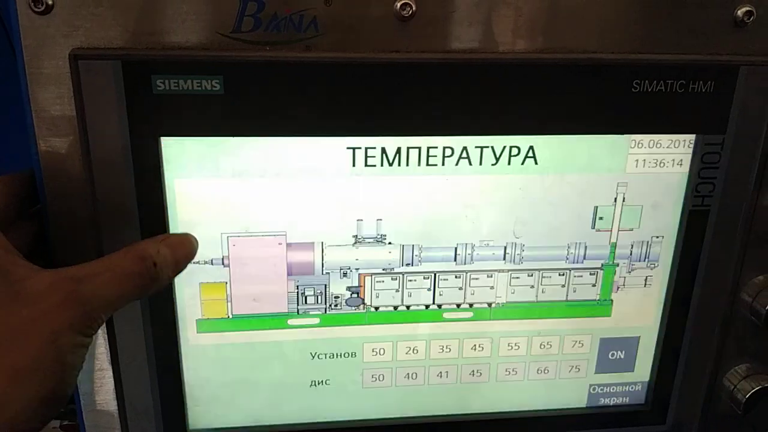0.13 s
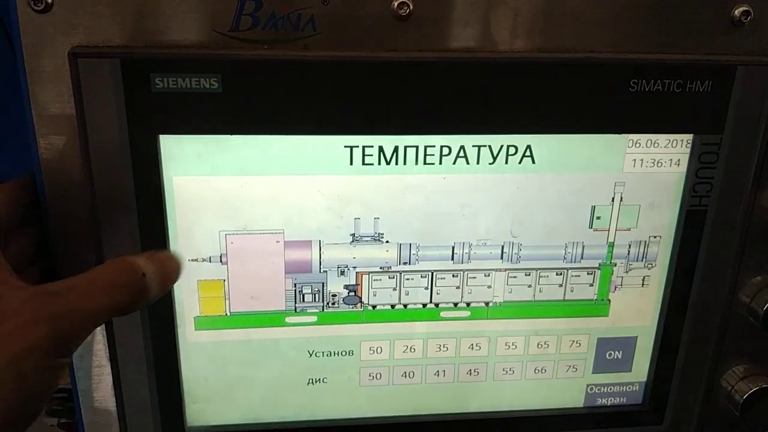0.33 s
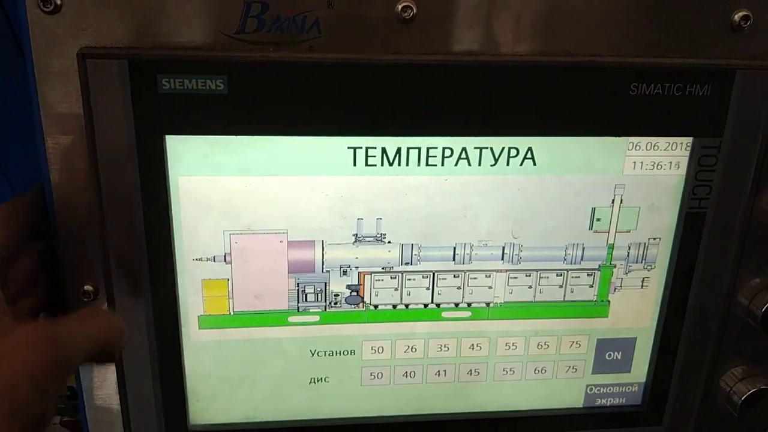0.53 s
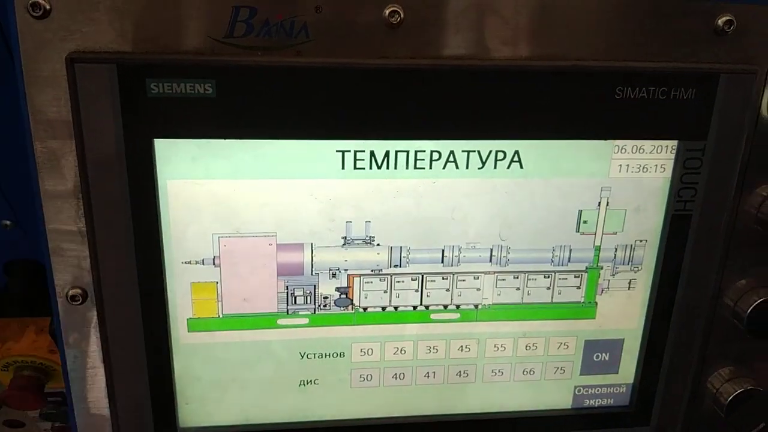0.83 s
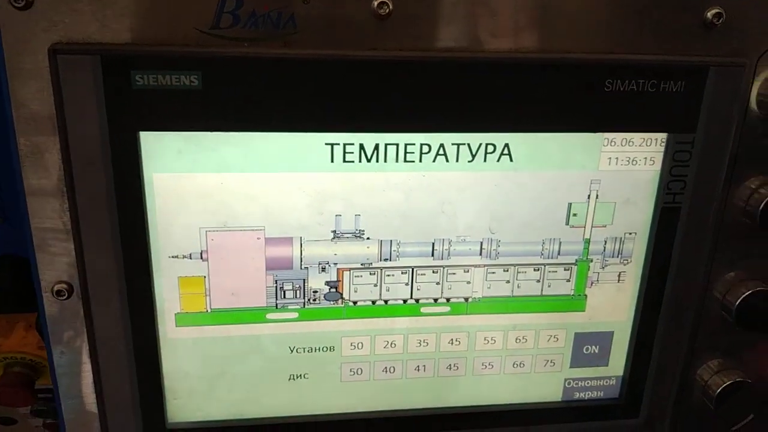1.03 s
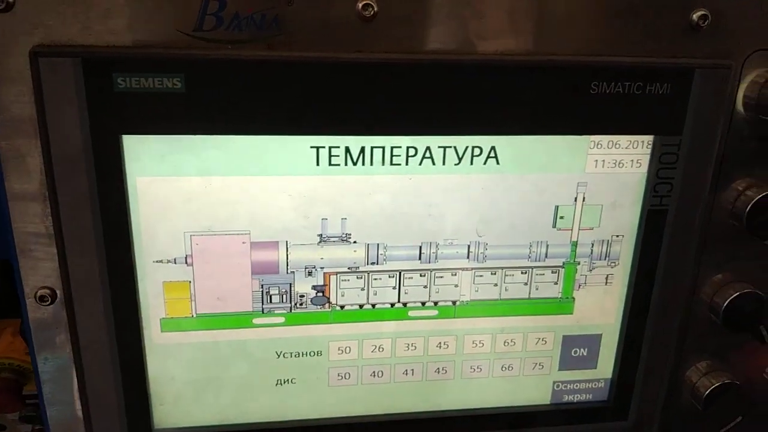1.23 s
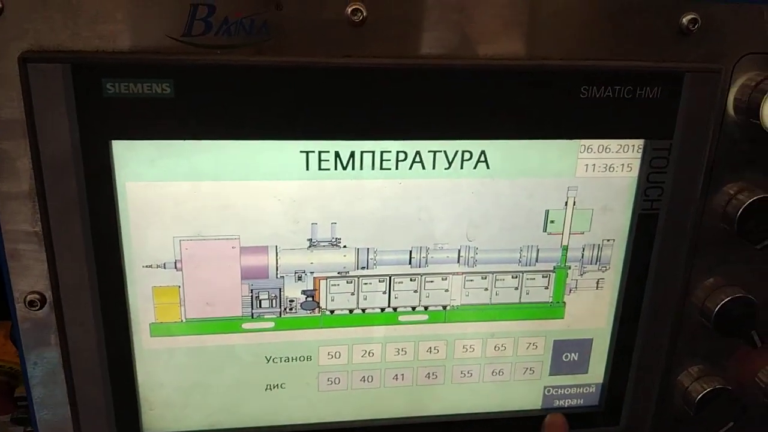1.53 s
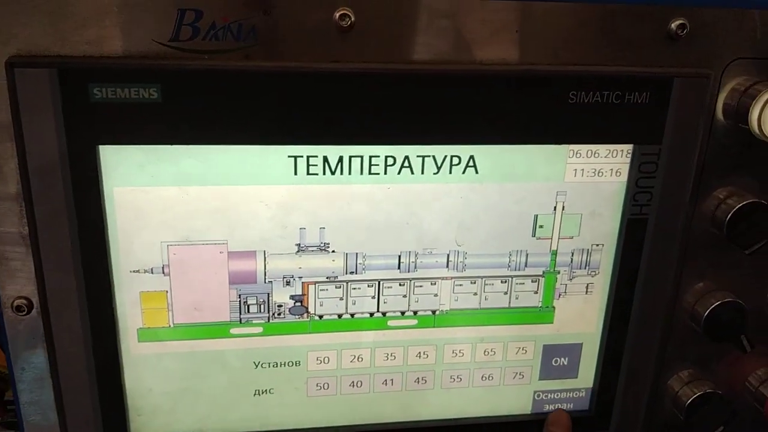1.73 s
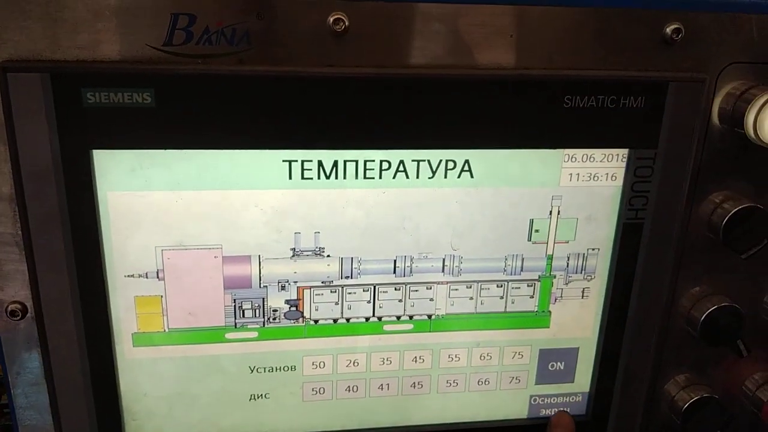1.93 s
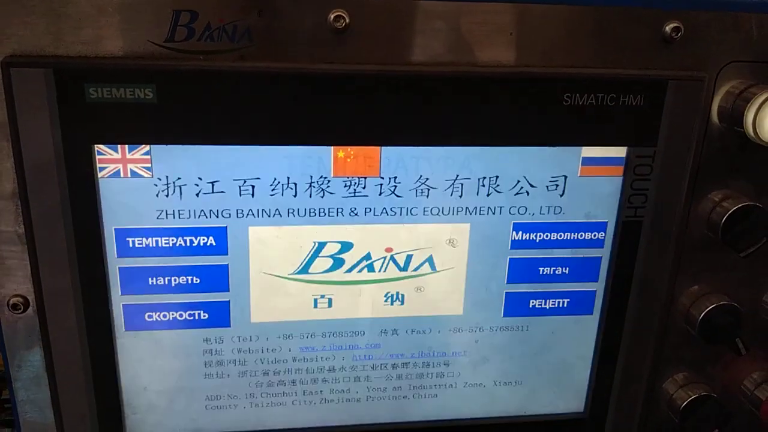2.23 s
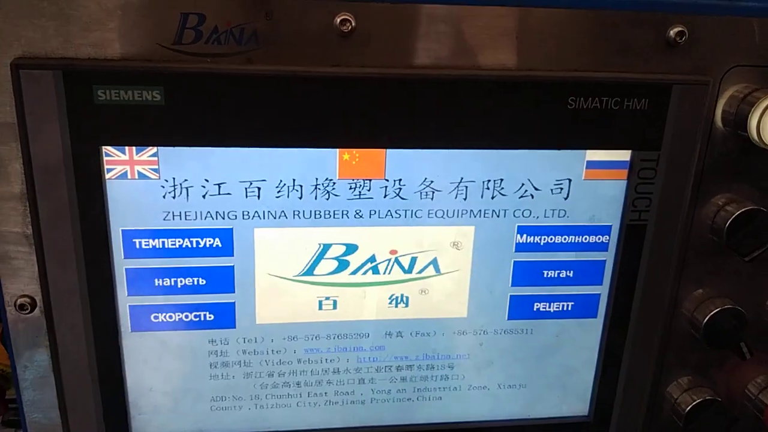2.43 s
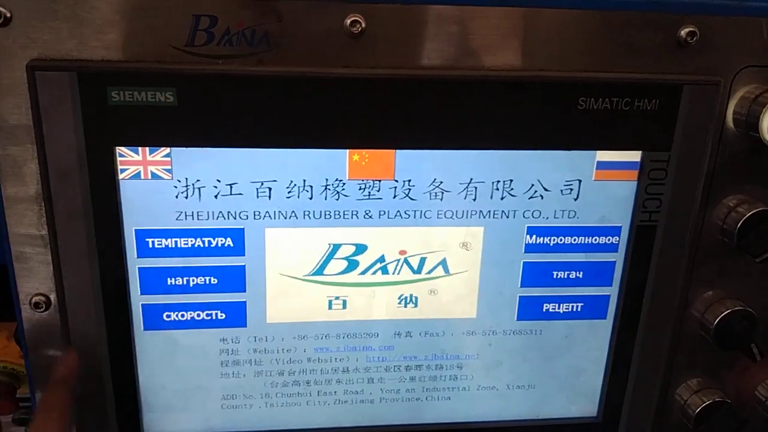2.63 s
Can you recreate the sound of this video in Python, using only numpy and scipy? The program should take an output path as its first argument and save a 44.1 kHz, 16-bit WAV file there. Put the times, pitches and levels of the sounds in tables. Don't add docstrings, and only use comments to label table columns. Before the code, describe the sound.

Fans and running equipment fill a large hall with an unbroken hum, hiss and high electrical whine. Close to the phone, a hand at a panel adds one barely audible tick, then two small clusters of clicks.

```python
import sys
import numpy as np
from scipy import signal
from scipy.fft import rfft, irfft
from scipy.io import wavfile
from scipy.ndimage import uniform_filter1d

SR = 44100
rng = np.random.default_rng(int(sys.argv[2]) if len(sys.argv) > 2 else 0)


def dump_mix(stems):
    frames = np.atleast_2d(stems).T
    limited = np.clip(frames, -1, 1)
    pcm = np.round(limited * 32767).astype(np.int16)
    wavfile.write(sys.argv[1], SR, pcm)


def how_loud(loudness_db):
    steps = np.asarray(loudness_db, float) / 20
    return 10 ** steps


N = 122598

# frequency in Hz, likeness from 0 to 1.
LIKENESS = [(60, .94), (200, .97), (380, .91), (700, .72), (1200, .25), (2200, .03), (15000, .02)]


def evened(x):
    return x / np.sqrt(np.mean(np.abs(x) ** 2) + 1e-20)


def read(points, hz):
    f, value = np.transpose(points)
    return np.interp(np.log(hz + 1), np.log(f + 1), value)


def drift(t, top_per_s):
    turns_per_s = top_per_s * rng.uniform(-1, 1, (24, 1))
    turns = np.exp(2j * np.pi * (turns_per_s * t + rng.random((24, 1))))
    return turns.sum(0) / np.sqrt(len(turns_per_s))


def sides(db):
    return how_loud(np.array([db / 2, -db / 2]))


def likeness(hz):
    return np.clip(read(LIKENESS, hz), 0, 1)


def complex_noise(shape):
    return rng.standard_normal(shape) + 1j * rng.standard_normal(shape)


def fan_air():
    # frequency in Hz, density in dB per Hz.
    rumble = [(25, -50), (110, -40.5), (165, -4.5), (215, 2), (320, -3.5), (480, -6.5), (700, -11),
              (1000, -12.5)]
    # frequency in Hz, density in dB per Hz.
    hiss = [(1000, 2), (1500, -3.5), (2040, -0.5), (3580, -7), (7400, -12), (10000, -19), (14100, -33),
            (15700, -25)]
    # frequency in Hz, width in Hz, lift in dB.
    humps = [(304, 11, 5), (514, 59, 3.5), (2000, 330, 0), (9800, 150, 1), (340, 12, -3), (152, 33, -2),
             (5230, 160, -2), (794, 50, 1.5), (101, 13, 16.5)]
    # frequency in Hz, width in Hz, lift in dB.
    ports = [(8000, 110, 3), (12850, 300, -4)]
    # frequency in Hz, left minus right in dB.
    balance = [(60, 0), (290, -1.5), (740, -.5), (2000, 6), (4000, 5.5), (7900, 3.5), (9800, 6),
               (11000, 12)]
    rumble_db, hiss_db = -20, -23
    patch_db, treble_patch_db, swell_db, flutter_db = .7, .5, .3, .5
    left_lag_s = .00017

    frames, hz = N // 512 + 5, np.fft.rfftfreq(2048, 1 / SR)
    t = np.arange(frames) * 512 / SR

    low = hz < hiss[0][0]
    high = ~low & (hz < hiss[-1][0])
    colour = how_loud(np.where(low, read(rumble, hz), read(hiss, hz)))
    low_power, high_power = [np.sum(colour[band] ** 2) * 4 / 2048 ** 2 for band in (low, high)]
    colour *= np.where(low, how_loud(rumble_db) / np.sqrt(low_power), how_loud(hiss_db) / np.sqrt(high_power)) / 1024

    patches = rng.standard_normal((1025, frames))
    patches = evened(uniform_filter1d(uniform_filter1d(patches, size=14, axis=0), size=4, axis=1))
    patch_depth_db = patch_db + treble_patch_db * (hz[:, None] / 15000) ** 2
    lift_db = sum(db * np.exp(-.5 * ((hz - f) / width) ** 2) for f, width, db in [*humps, *ports])
    treble = (hz / (hz + 6000))[:, None] ** 2
    field_db = lift_db[:, None] + patch_depth_db * patches
    field_db = field_db + swell_db * drift(t, 2.56).real + flutter_db * treble * drift(t, 14).real

    same = likeness(hz)[:, None]
    left = complex_noise((1025, frames))
    right = same * left + np.sqrt(1 - same ** 2) * complex_noise((1025, frames))
    right = right * np.exp(2j * np.pi * hz * left_lag_s)[:, None]
    z = np.array([left, right]) * (sides(read(balance, hz)) * colour)[:, :, None] * how_loud(field_db)
    return 1.218 * signal.istft(z, nperseg=2048, noverlap=1536)[1][:, :N]


def tone(hz, level_db, lean_db):
    # time in seconds, high whine level in dB, gear tone level in dB.
    standing = [(0, -3, -2), (.6, -5, -2), (.75, 3, 1), (1.1, 4, 3), (1.28, 4, -4), (1.44, -2, 3),
                (1.63, -4, -8), (1.78, -5, 1), (1.95, -5, -4), (2.11, -6, 5), (2.28, -7, -7), (2.42, -5, 1),
                (2.56, 2, -1), (2.78, 3, -4)]
    standing_hz = (7973.6, 834.4)

    slow = np.arange(0, N + 256, 256) / SR
    same = likeness(hz)
    s, *curves_db = np.transpose(standing)
    held = np.isclose(standing_hz, hz)
    path = how_loud(np.interp(slow, s, held @ np.array(curves_db)))

    waver = .55 if held.any() else .9
    waver_per_s = 6 - .5 * hz / 1000
    a, b = (np.exp(2j * np.pi * rng.random()) + waver * drift(slow, waver_per_s) for port in range(2))
    left = evened(a * path)
    right = evened((same * a + np.sqrt(1 - same ** 2) * b) * path ** same)

    gains = np.repeat([left, right], 256, axis=1)
    gains = uniform_filter1d(gains.real, size=256)[:, :N] + 1j * uniform_filter1d(gains.imag, size=256)[:, :N]
    wave = (gains * np.exp(2j * np.pi * hz * np.arange(N) / SR)).real
    return how_loud(level_db) * sides(lean_db)[:, None] * np.sqrt(2) * wave


def blades_and_gears():
    # frequency in Hz, level in dB, left minus right in dB.
    hums = [(285.5, -34, -1), (314, -32, -7), (490, -38.5, 2), (529, -42, 2), (758.5, -42, -2),
            (834.4, -36, -3), (2064.3, -45, 14), (2115, -44, 10), (2496.3, -45, 7), (2654.4, -49.5, 12),
            (2990, -53.5, 12), (3341, -48, -4), (3396, -55, 17), (3424.6, -45.5, 13), (3722, -55, 11),
            (4245, -49.5, 4), (4576, -52, 9), (7794.5, -52, 7), (3286, -51, 3), (1760, -47, 8)]
    return sum(tone(*row) for row in hums)


def inverter():
    # multiple of switching rate, multiple of motor rate, level in dB, left minus right in dB.
    whine = [(1, -5, -44, 0), (1, -1, -43, 18), (1, 1, -44, 14), (1, 5, -44.5, 8), (1, -3, -48.5, 8),
             (2, -2, -43.5, 4), (2, 0, -51, 7), (2, 2, -46.5, 4), (3, -1, -56, 9), (3, 3, -59, -8),
             (4, -1, -47, 3), (4, 0, -58, -3), (4, 1, -47.5, -3), (5, 0, -66, 16), (6, -2, -71, 8),
             (6, 2, -68, 10)]
    switch_hz, motor_hz = 2000, 26.4
    return sum(tone(k * switch_hz + m * motor_hz, db, lean_db) for k, m, db, lean_db in whine)


def hand_ticks():
    # start in seconds, level in dB, length in seconds, left minus right in dB, top edge lift in dB.
    touches = [
        (.9655, -32, .03, 11, 0),
        (1.8445, -25.5, .024, 15, 3),
        (1.903, -37, .03, 10, -3),
        (1.9145, -26, .035, 11, -6),
        (2.169, -32, .02, 13, 2),
        (2.1745, -24.5, .02, 13, 0),
        (2.187, -37, .04, 12, 8),
    ]
    # frequency in Hz, level in dB.
    tick_tone = [(3000, -25), (5500, -11), (7000, 1), (8600, 1), (10300, 7), (12200, -10), (13800, -4),
                 (15700, -10)]
    rise_s, grains_per_s, edge_hz = .004, 7000, 12000

    out, t, hz = np.zeros((2, N)), np.arange(N) / SR, np.fft.rfftfreq(N, 1 / SR)
    colour = evened(how_loud(read(tick_tone, hz)))
    for s, db, length, lean_db, edge_db in touches:
        u = np.maximum(t - s, 0)
        grains = rng.random(N) < grains_per_s / SR
        snaps = evened(rng.standard_normal((2, N)) * (0.46 + grains * 2))
        envelope = np.minimum(u / rise_s, 1) * how_loud(-20 * u / length)
        clump = how_loud(db) * sides(lean_db)[:, None] * snaps * envelope
        out += irfft(rfft(clump) * colour * how_loud(edge_db * (hz > edge_hz)), N)
    return out


def scene():
    return fan_air() + blades_and_gears() + inverter() + hand_ticks()


def treble_gate(x):
    # frequency in Hz, threshold in dB.
    bin_gate = [(1000, -80), (4000, -12), (7000, -4), (10500, -1), (12000, 1.5), (12800, 3.5), (13500, 2),
                (14600, 2.5), (15100, 4), (15700, 5)]
    # frequency in Hz, threshold in dB.
    band_gate = [(9000, -6), (11500, -1), (12800, .8), (13600, -1), (14500, -.3), (15000, 2.3),
                 (15600, 4.5)]
    right_bin_db, right_band_db = 3, .8
    follow, slack_db = .6, 2.5
    band_bins, lead = 25, 576

    padded = np.pad(x, ((0, 0), (lead, 0)))
    hz, t, z = signal.stft(padded, SR, nperseg=2048, noverlap=1024, window="cosine")
    power, right = np.abs(z) ** 2, np.arange(2)[:, None, None]
    steady = uniform_filter1d(np.median(power, axis=2, keepdims=True), size=31, axis=1)

    rise = uniform_filter1d(power / steady, size=61, axis=1) / how_loud(2 * slack_db)
    rise = np.maximum(rise, 1) ** follow
    bin_db = read(bin_gate, hz)[:, None] + right_bin_db * right
    keep = uniform_filter1d(power, size=3, axis=1) > steady * rise * how_loud(2 * bin_db)

    band_db = read(band_gate, hz)[:, None] + right_band_db * right
    margin = power / steady / how_loud(2 * band_db)
    bands = margin.reshape(2, -1, band_bins, len(t)).mean(axis=2) > 1

    z = z * keep * np.repeat(bands, band_bins, axis=1)
    return signal.istft(z, SR, nperseg=2048, noverlap=1024, window="cosine")[1][:, lead:lead + N]


def low_pass(x):
    return signal.sosfilt(signal.butter(12, 15620, fs=SR, output="sos"), x)


def record(dry):
    mix = treble_gate(dry) * np.minimum(np.arange(N) / SR / .006, 1)
    return low_pass(mix)


dry = scene()
out = record(dry)
dump_mix(out)
```